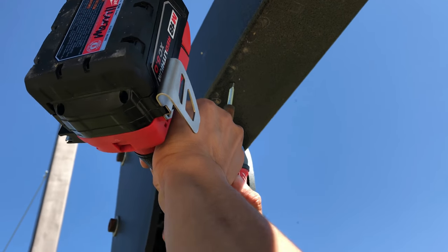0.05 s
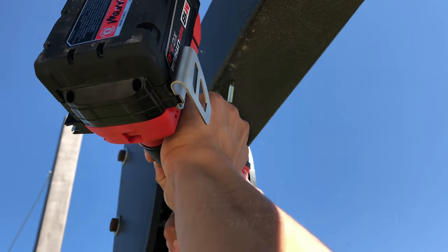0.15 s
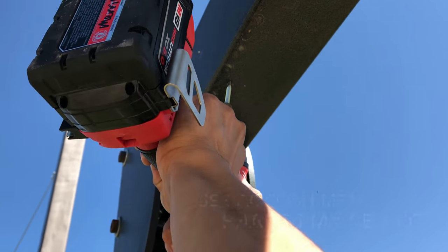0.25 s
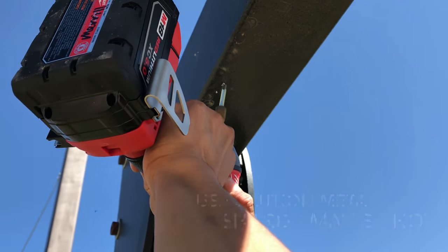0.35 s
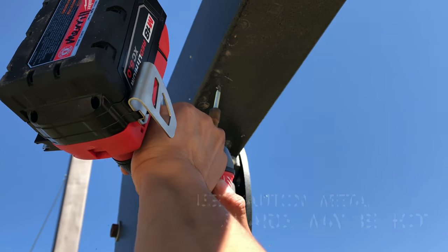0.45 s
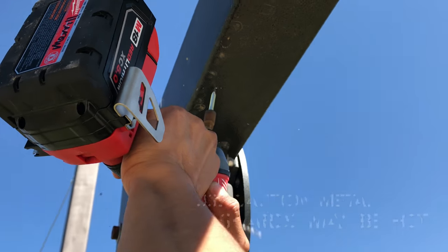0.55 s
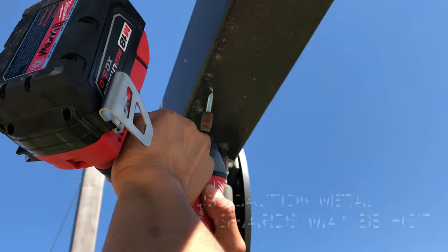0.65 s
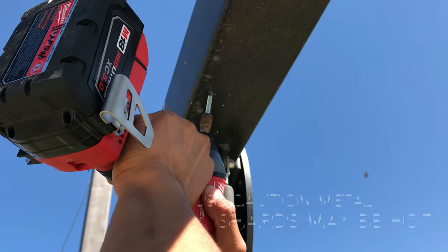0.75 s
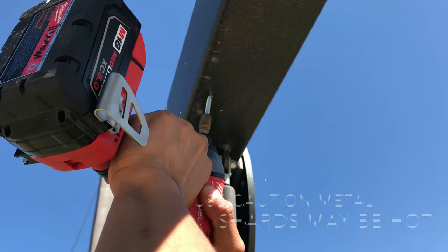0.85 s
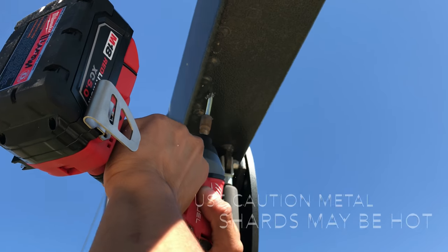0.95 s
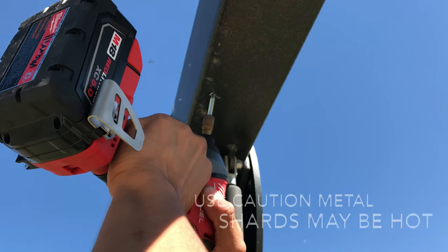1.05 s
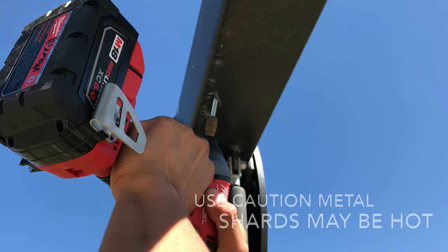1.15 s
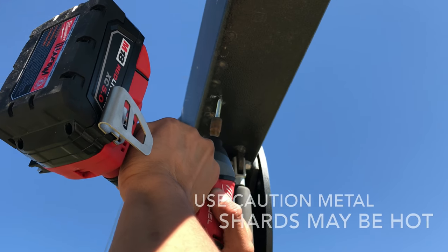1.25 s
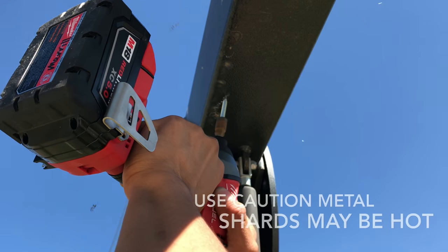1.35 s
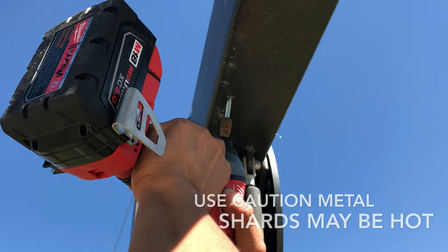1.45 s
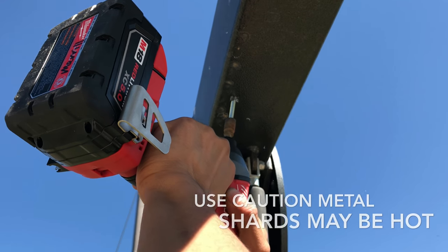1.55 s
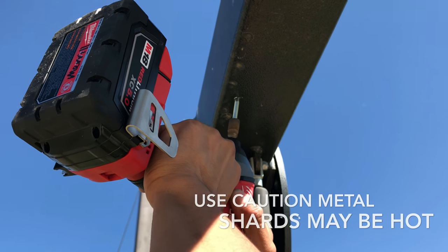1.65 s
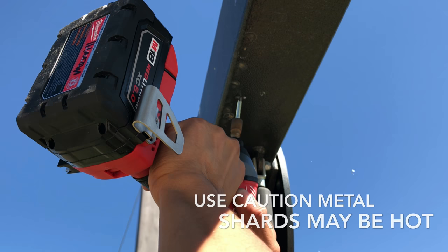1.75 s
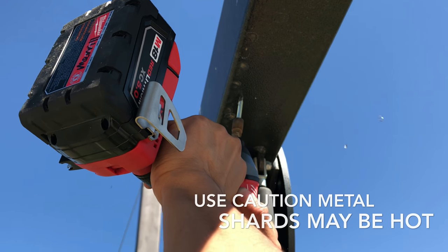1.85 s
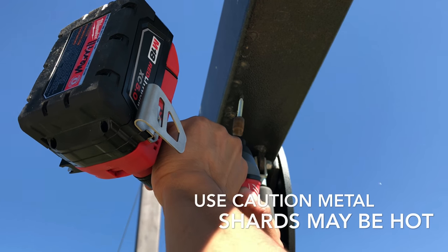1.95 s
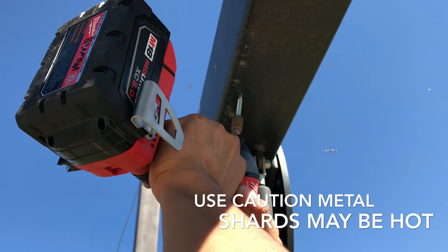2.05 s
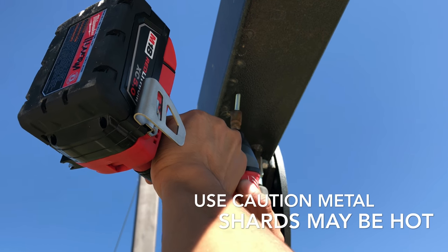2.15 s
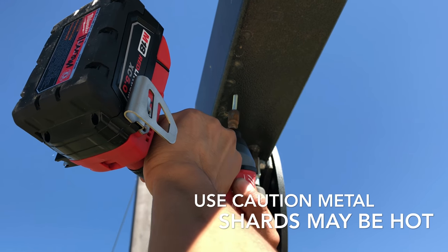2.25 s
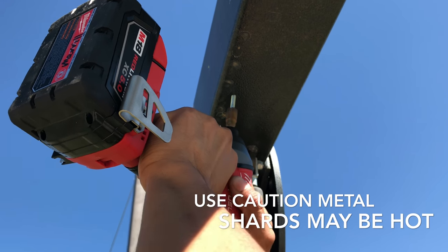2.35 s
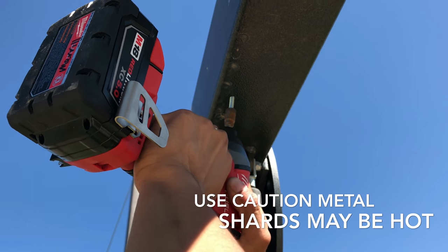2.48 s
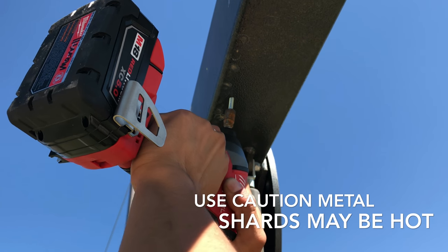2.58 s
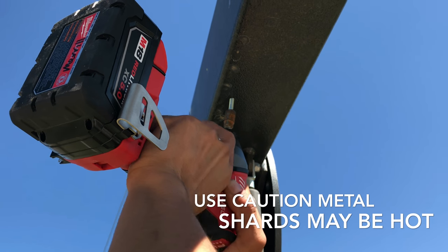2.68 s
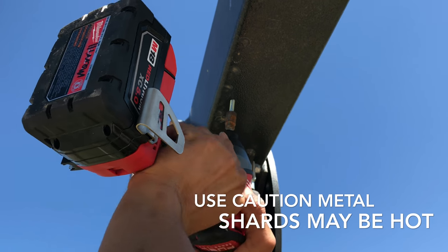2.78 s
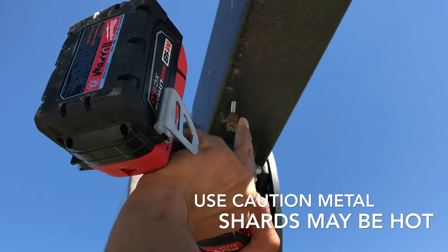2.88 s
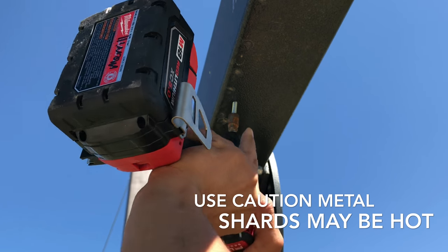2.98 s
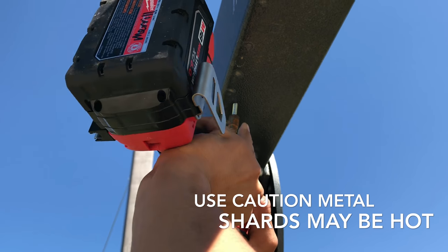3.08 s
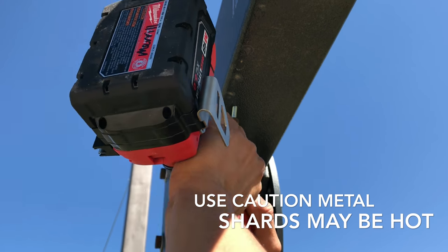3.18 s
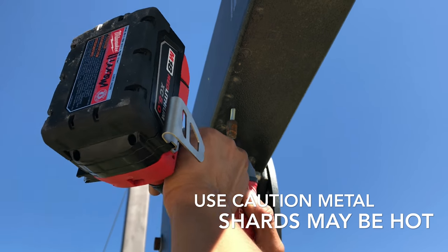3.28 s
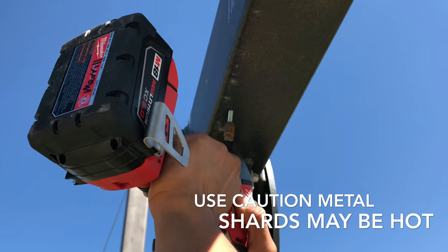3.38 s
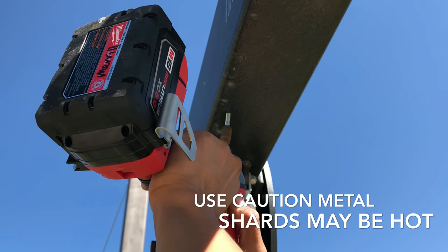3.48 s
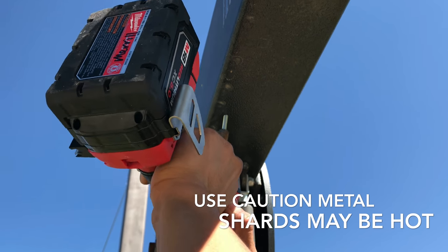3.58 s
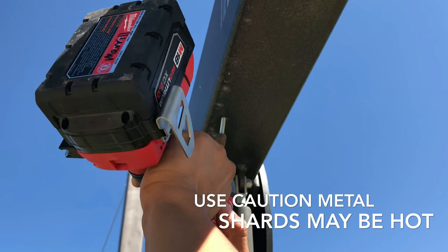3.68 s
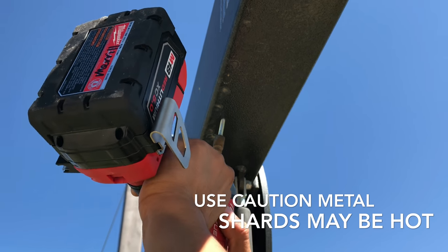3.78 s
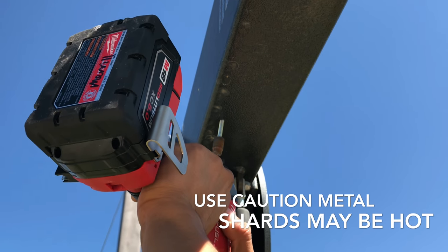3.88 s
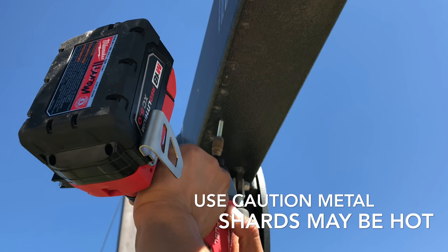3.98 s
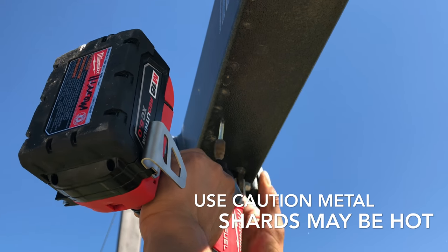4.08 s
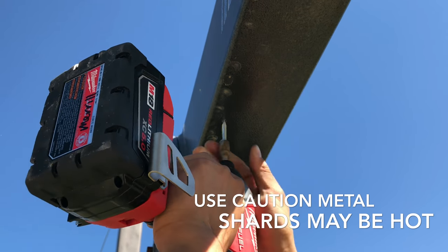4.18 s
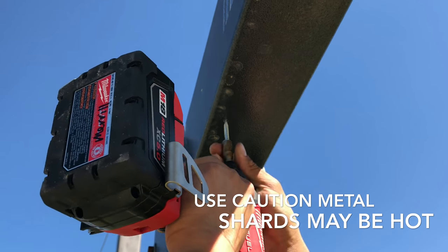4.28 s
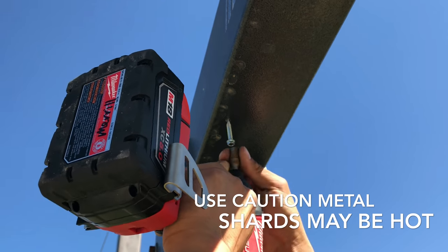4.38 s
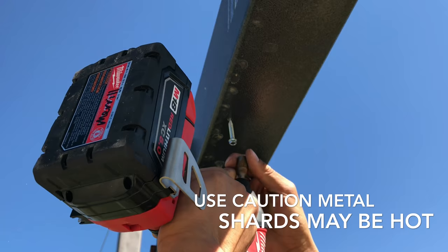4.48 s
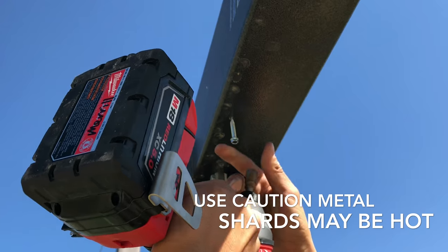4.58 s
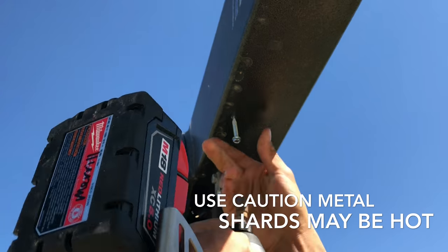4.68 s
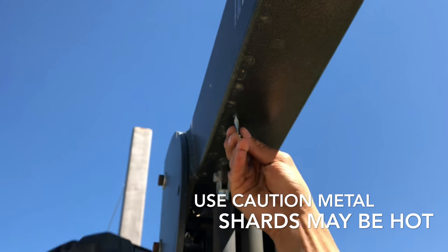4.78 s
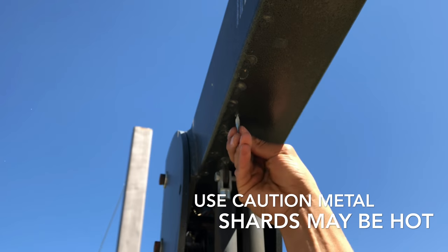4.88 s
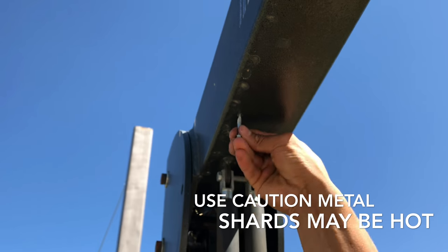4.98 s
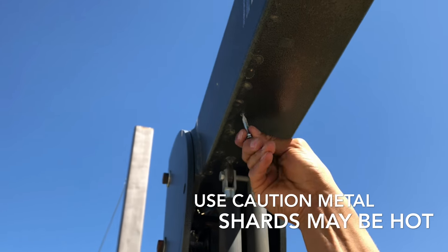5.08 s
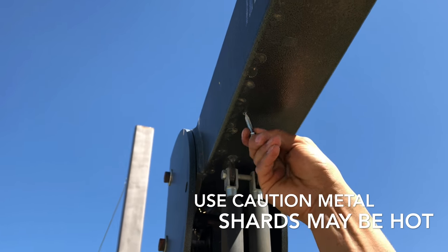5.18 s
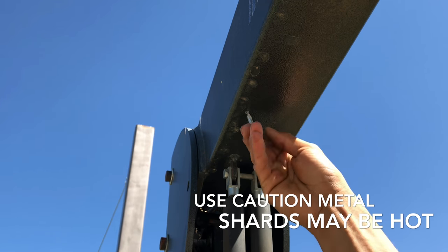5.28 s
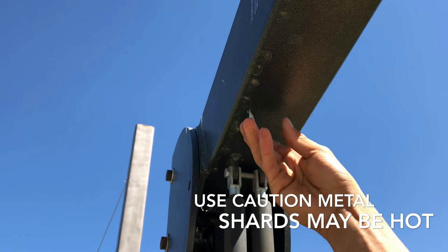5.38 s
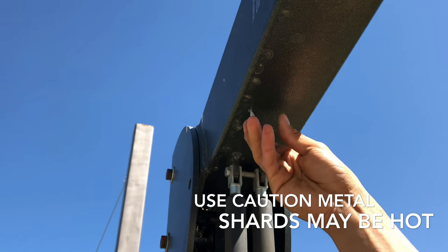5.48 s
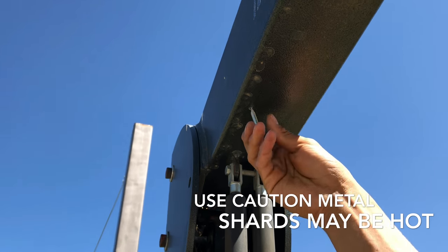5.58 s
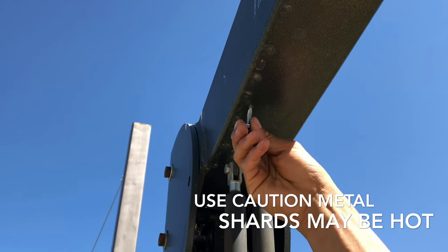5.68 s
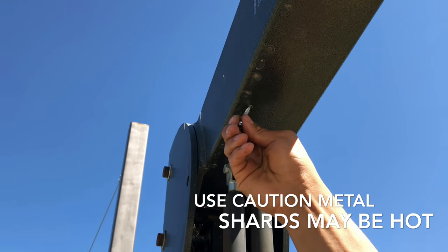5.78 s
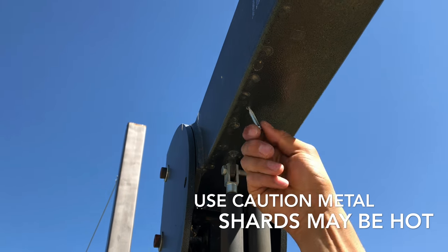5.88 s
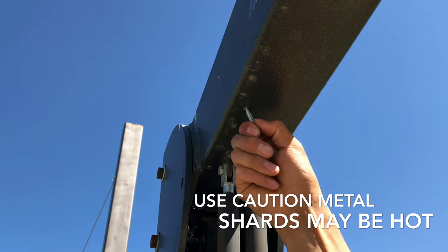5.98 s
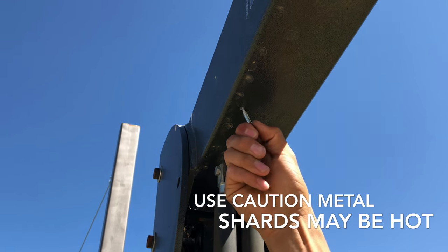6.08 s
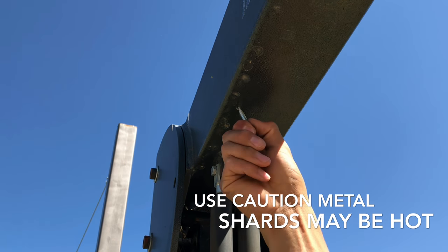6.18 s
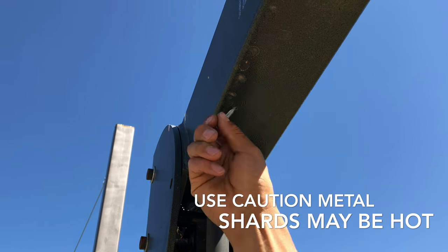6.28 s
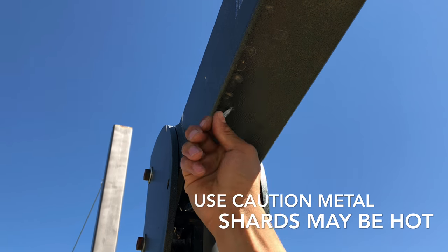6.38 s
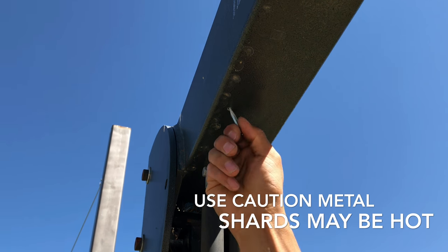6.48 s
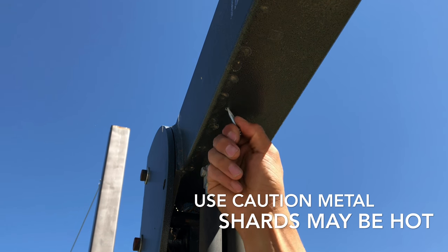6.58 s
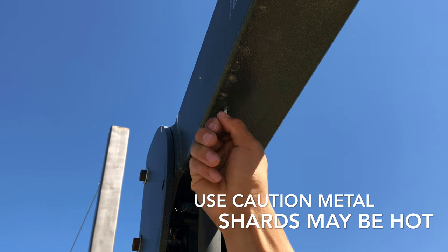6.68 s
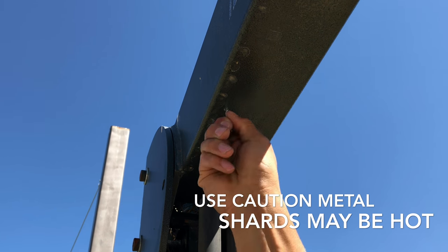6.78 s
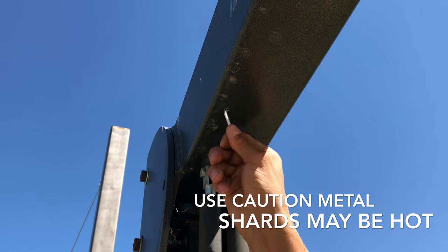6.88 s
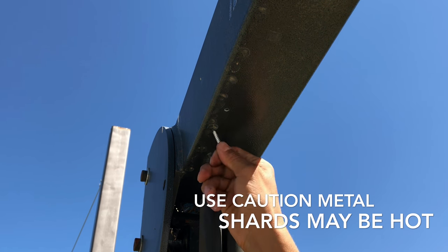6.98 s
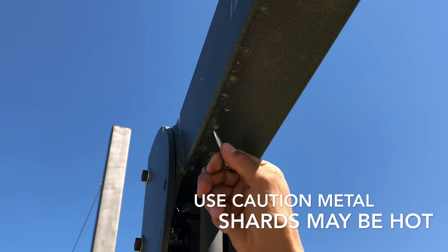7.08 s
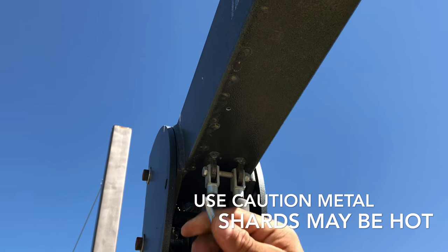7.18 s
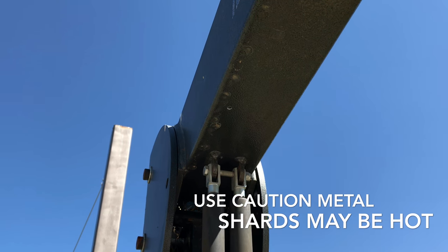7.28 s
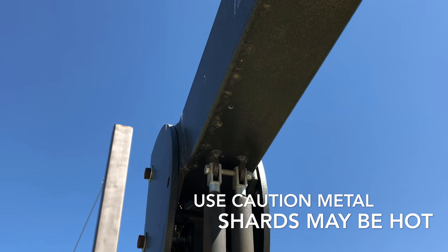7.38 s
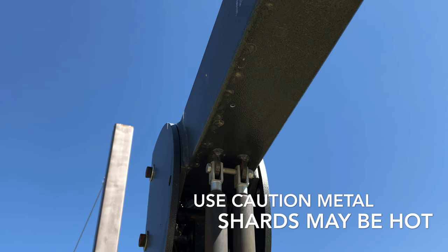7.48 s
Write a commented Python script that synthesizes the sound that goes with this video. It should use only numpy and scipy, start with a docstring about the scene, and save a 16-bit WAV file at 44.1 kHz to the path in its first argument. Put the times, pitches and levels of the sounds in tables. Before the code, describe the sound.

A loud, rough gear whine with gritty cutting noise opens, slowing slightly before a rattling burst of steel hammering. It cuts off, leaving a faint ring and small clicks. A second violent burst loosens into a light, quick free spin and a clicking stop. The holder slips off with a tiny ping; fingers rub faintly, then the steel is knocked. Close, dry pickup in open air, with a faint rumble and far traffic.

```python
"""A gear whine opens the scene: a cordless impact driver sinks a self-drilling screw into a steel arm.
It hammers as the thread bites, stops, hammers again and spins free; then fingers rub and the arm is knocked.
A low outdoor rumble and a far hush of traffic lie below. The whine is a sum of sines locked to the spindle
angle; blows, cutting and whine excite decaying modes of the arm; rush, rumble and hush are filtered noise."""
import sys
import numpy as np
from scipy import signal
from scipy.fft import rfft, irfft
from scipy.io import wavfile
from scipy.ndimage import uniform_filter1d, minimum_filter1d

SR = 44100
rng = np.random.default_rng(int(sys.argv[2]) if len(sys.argv) > 2 else 0)


def log_audio(samples):
    """Write samples as a 16-bit WAV file to the path given in sys.argv[1]."""
    # one column per channel
    frames = np.atleast_2d(samples).T
    # limit to full scale, then quantise
    limited = np.clip(frames, -1, 1)
    pcm = np.round(limited * 32767).astype(np.int16)
    wavfile.write(sys.argv[1], SR, pcm)


N = 332759
T = np.arange(N) / SR   # time axis [s]
BITE_S, LET_GO_S = 2.12, 3.79   # the thread bites and hammering begins; the load comes off


def amp(db):
    """Logarithmic level: decibels to an amplitude gain."""
    return 10 ** (np.asarray(db) / 20)


def rms_one(x):
    """Normalisation: scale a signal to unit rms."""
    return x / np.sqrt(np.mean(x ** 2) + 1e-20)


def in_time(*tables, fade=.012):
    """Linear interpolation of successive tables over time, with a last column that gates the gaps shut."""
    s, *columns = np.transpose(np.vstack(tables))
    gate = np.zeros(N)
    for table in tables:
        start, end = table[0][0], table[-1][0]
        gate += np.interp(T, [start - fade, start, end, end + fade], [0, 1, 1, 0])
    return [np.interp(T, s, column) for column in columns] + [gate]


def at_hz(points, hz):
    """Linear interpolation of a table on a log-frequency axis."""
    hz_points, values = np.array(points).T[:2]
    return np.interp(np.log(hz), np.log(hz_points), values)


def drift(rate):
    """Low-passed random fluctuation: two-pole filtered noise of unit rms, slower for a low rate [Hz]."""
    r = np.exp(-32 * np.pi * rate / SR)   # one step per 16 samples
    white = rng.standard_normal(N // 16 + 4002)
    slow = signal.lfilter([1], [1, -2 * r, r * r], white)[4000:]   # drop the filter's start
    return np.interp(np.arange(N) / 16, np.arange(len(slow)), rms_one(slow))


def clicks(seconds, db):
    """Impulse excitation: single samples of given heights."""
    out = np.full(N, 1e-18)
    np.add.at(out, (np.asarray(seconds) * SR).astype(int), amp(db))
    return out


def ring(x, hz, t60):
    """Damped resonance: a unit click sets a sine of height 1 ringing."""
    r, w = amp(-60 / (t60 * SR)), 2 * np.pi * hz / SR
    return signal.lfilter([0, np.sin(w)], [1, -2 * r * np.cos(w), r * r], x)


def dying(x, t60):
    """Exponential decay: every sample leaves a tail that falls 60 dB in t60."""
    return signal.lfilter([1], [1, -amp(-60 / (t60 * SR))], x)


def bands(spectrum):
    """Spectral shaping: pairs of centre frequency and half-octave noise, of unit rms when summed."""
    edges, white = 90 * 2 ** np.arange(0, 7.8, .5), rng.standard_normal((2, N))
    centres = np.sqrt(edges[1:] * edges[:-1])
    parts = []
    for k, hz in enumerate(centres):
        band = signal.butter(2, edges[k:k + 2], "band", fs=SR, output="sos")
        parts.append(amp(at_hz(spectrum, hz)) * signal.sosfilt(band, white[k % 2]))
    parts = np.array(parts)
    return zip(centres, parts / parts.sum(0).std())


# Spindle speed in two runs: start_s, speed_turns_per_s
SPINDLE_SPEED = [
    [(0, 43.5), (.2, 42.5), (.5, 41.35), (.72, 40.85), (.86, 42.1), (1.4, 40.7), (1.52, 41.0), (1.75, 40.6),
     (1.9, 39.9), (2, 38.3), (2.1, 36), (2.3, 35)],
    [(3.74, 38.5), (3.8, 39.3), (3.86, 41.3), (4.01, 44.2), (4.05, 44.8), (4.1, 41.6), (4.155, 34)],
]


def spindle():
    """Rotation: integrated speed gives the angle in turns, with a gate open while it spins."""
    turns_per_s, spinning = in_time(*SPINDLE_SPEED)
    return np.cumsum(turns_per_s) / SR, spinning


# Tones as multiples of the spindle: its wobble, the 63-tooth gear mesh with side tones,
# the motor poles and the 10-blade fan on the 8:1 motor: order_per_turn
SPINDLE_ORDERS = [1, 2, 3, 4, 5, 7, 8, 10, 11, 13, 32, 54, 55, 62, 63, 64, 66, 80, 124, 126, 128, 129, 130,
                  171, 180, 189, 207, 243, 288]
# Relative level of each order in the first run: level_db
FIRST_RUN_ORDER_DB = [-27, -24, -31.5, -33, -31, -29.5, -31.5, -26.5, -18, -18.5, -24.5, -8.5, -11, -1, 4,
                      0, -5.5, -6.5, -7.5, -2, -6, -13, -4, -16.5, -14, -7.5, -11, -23.5, -12.5]
# Relative level of each order spinning free in the second run: level_db
FREE_ORDER_DB = [-40, -44, -32, -38, -28, -20.5, -30, -35, -23, -32, -6.5, -28, -24, -24.5, -19.5, -27, -22,
                 7, -19, -22.5, -8, -19.5, 4.5, -27.5, -28, -29, -23.5, -34, -34]
# Overall whine in each run: start_s, level_db
WHINE_LEVEL = [
    [(0, -31.5), (.7, -28), (1.8, -26.5), (2.05, -26.5), (2.3, -23)],
    [(3.74, -36.5), (3.86, -45), (4.05, -38.5), (4.155, -41.5)],
]
STUTTER_DB, STUTTER_ENDS_S = 6.5, 4.03   # unloaded, the high orders stutter once a turn


def whine(turns, spinning, rough_db=2.6):
    """Order synthesis: each order is a sine locked to the spindle angle, wavering in level and phase."""
    out = np.zeros(N)
    whine_db = in_time(*WHINE_LEVEL)[0]
    stuttering = (T > LET_GO_S) & (T < STUTTER_ENDS_S)
    stutter_db = STUTTER_DB * np.sin(2 * np.pi * turns) * stuttering
    for order, first_db, free_db in zip(SPINDLE_ORDERS, FIRST_RUN_ORDER_DB, FREE_ORDER_DB):
        waver_db = rough_db * drift(1.5 + .4 * order)   # high orders flutter faster
        wander = .006 * order * drift(25)               # phase tremble [rad]
        order_db = np.where(T < 3, first_db, free_db)
        level = amp(whine_db + order_db + waver_db + (order > 100) * stutter_db)
        phase = 2 * np.pi * order * turns + wander + rng.uniform(0, 7.1)
        out += np.sqrt(2) * level * np.sin(phase)
    return spinning * out


def throb(turns, once=1.2, twice=1.3, motor=1.1):
    """Amplitude modulation: a beat [dB] per spindle turn, per cutting lip (two) and per motor turn."""
    angle = 2 * np.pi * turns
    return amp(once * np.sin(angle) + twice * np.sin(2 * angle + 1) + motor * np.sin(8 * angle))


# Load on the bit in two runs, heard as cutting noise in the arm: start_s, level_db
BIT_LOAD = [
    [(0, -21), (1.9, -22), (2.1, -20.5), (2.2, -4.5), (2.3, -8.5), (2.4, -18.5), (2.58, -17), (2.66, -40.5),
     (2.72, -54)],
    [(3.44, -40), (3.484, -24.5), (3.495, -11.5), (3.57, -1.5), (3.64, -11), (3.76, -13), (3.8, -32.5),
     (4.15, -30), (4.19, -30.5), (4.232, -42)],
]


def load(turns):
    """Load coupling: the load level, and the beat of the turning tool gated to its runs."""
    load_db, running = in_time(*BIT_LOAD)
    return load_db, running * throb(turns)


# Margin of the rush over the load while drilling, hammering, spinning free: level_db
RUSH_MARGINS = (0, -11, 0.5)
RUSH_WARM_UP_DB, RUSH_WARM_UP_S = -3.5, 1   # the rush grows as the tip digs in


def rush_level(load_db):
    """Load-dependent radiation: the rush follows the load by a margin for each working state."""
    drilling_db, hammering_db, free_db = RUSH_MARGINS
    margin_db = np.where(T < BITE_S, drilling_db, np.where(T < LET_GO_S, hammering_db, free_db))
    warm_db = RUSH_WARM_UP_DB * np.clip(1 - T / RUSH_WARM_UP_S, 0, 1)
    return amp(load_db + uniform_filter1d(margin_db, size=2000) + warm_db)


# Gear rattle, brush of the fan air and chips, relative density: pitch_hz, level_db (per Hz)
LOADED_RUSH = [(59, -59), (100, -38), (373, -34.5), (442, -22.5), (768, -30.5), (1610, 4.5), (2370, -5),
               (2580, 1), (3540, -4), (5190, -9.5), (5900, 1), (7610, -1.5), (16000, -6.5)]
# The same noise unloaded: pitch_hz, level_db (per Hz)
UNLOADED_RUSH = [(59, -50), (100, -26), (302, -7.5), (381, -34), (442, -19), (595, -6), (752, -25),
                 (1420, 8.5), (2580, -13), (3470, -4), (3860, -4.5), (8640, -7.5), (16000, -20)]
# Resonance of the gear housing, heard unloaded: pitch_hz, t60_s, level_db
GEAR_HOUSING = (8640, 0.0065, -8.5)


def patchy(spectrum):
    """Independent band fluctuation: each noise band drifts in level by itself."""
    return sum(noise * amp(0.98 * drift(20)) for hz, noise in bands(spectrum))


def rush(level):
    """Broadband turbulence and rattle: patchy noise, recoloured and joined by the housing once unloaded."""
    loaded, free = patchy(LOADED_RUSH), patchy(UNLOADED_RUSH)
    hz, t60, housing_db = GEAR_HOUSING
    housing = rms_one(ring(rng.standard_normal(N), hz, t60))
    free = free + amp(housing_db + 2.2 * drift(30)) * housing
    return level * np.where(T < LET_GO_S, loaded, free)


# Hammer on anvil, also played by cracks(): start_s, level_db (strength)
HAMMER_BLOWS = [(2.1036, -17.5), (2.144, -16), (2.1677, -10.5), (2.1925, -6.5), (2.2187, -8.5),
                (2.2413, -3), (2.264, -8), (2.2862, -9), (2.3053, -3), (2.3259, -7.5), (2.3489, -10.5),
                (2.3695, -13), (2.3919, -9.5), (2.4163, -16.5), (2.441, -17.5), (2.4634, -18),
                (2.491, -11.5), (2.514, -19), (2.5398, -11), (2.5691, -19), (2.5941, -11), (2.6258, -26.5),
                (3.487, -16), (3.5057, -14.5), (3.5389, -5), (3.5585, -10.5), (3.5827, -12.5),
                (3.6082, -1.5), (3.632, -4.5), (3.6555, -1), (3.6805, -6.5), (3.7046, -13.5), (3.7295, -2),
                (3.7627, -8.5)]
# Touches on the arm: start_s, level_db
ARM_KNOCKS = [(4.426, -50.5), (4.449, -49), (5.946, -62), (6.052, -57.5), (6.947, -51), (6.993, -41.5),
              (7.008, -27.5), (7.034, -33), (7.068, -46)]
# Dull low jolts of the arm, under the hammering and the last knock, also played by thumps(): start_s, level_db
LOW_JOLTS = [(2.192, -11), (2.239, -37), (2.415, -23), (2.541, -18.5), (2.58, -16.5), (3.486, -39),
             (3.51, -7.5), (3.656, -16.5), (3.759, -23), (7.035, -30), (7.068, -28)]
# Clear modes of the steel arm: pitch_hz, level_db, t60_s
ARM_MODES = [(453, -31.5, 3.05), (479.6, -34.5, 3), (462, -12, .15), (307, -20, 0.13), (372, -32, .3),
             (527.7, -11, 0.37), (595.1, -7.5, 0.33), (623, -26, 0.9), (685, -38, 1.6), (890, -24, 0.63),
             (1034, -16, .2), (1114, -11, 0.17), (1238, -20.5, 0.47), (1394, -4, 0.2), (1423, -4.5, 0.22),
             (1454, -1.5, 0.22), (1595, -1.5, .11), (1614, 2, .12), (1647, -2, .13), (1750, -11.5, 0.29),
             (1946, -17, 0.31), (2120, -1, 0.18), (2251, -5.5, 0.17), (2350, -13.5, .2), (2508, -10.5, .15),
             (3070, -1.5, .12), (3266, -7, .13), (3360, -9, 0.22), (3903, -9.5, .13), (4270, -1, .09),
             (5380, -11.5, 0.053)]
# The arm's countless close modes, relative density: pitch_hz, level_db (per Hz)
WASH_SPECTRUM = [(59, -57), (100, -37.5), (381, -42), (461, -18.5), (721, -17), (1280, 0), (1610, 4.5),
                 (1830, -10.5), (2170, -2), (2420, 3.5), (4380, -3.5), (4980, -2), (16000, -9)]
# Decay of those close modes: pitch_hz, t60_s
WASH_DECAY = [(200, 0.12), (1500, 0.25), (4000, 0.15), (8000, 0.04), (15000, 0.032)]
# Short slam of a blow over that wash: pitch_hz, level_db
SLAM_SPECTRUM = [(200, -2), (1500, 0.5), (4000, 6.5), (8000, -2.5), (15000, 10)]
SLAM_T60_S = .06
THUD_HZ = 750   # modes below this answer to the thud
RING_DB, THUD_DB = -10.5, -19.5   # a blow's drive of ring and low thud, over its strength
KNOCK_THUD_DB, KNOCK_WASH_DB = -26, 2.5   # knocks hardly move the low modes, and sound more in the wash
LONG_RING_HZ, DAMPED_S = 453, 4.1   # this ring is damped once the screw comes loose
CONTACT_SPREAD_DB = 3   # the contact shifts, so each mode is driven unevenly
BLOW_SPREAD_DB = 3.5    # chance differences between blows


def arm(cutting, whining, contact_t60=0.026):
    """Modal synthesis: contacts, cutting and whine ring clear modes and a wash dying band by band."""
    blow, knock, jolt = np.array(HAMMER_BLOWS), np.array(ARM_KNOCKS), np.array(LOW_JOLTS)
    at = np.r_[blow[:, 0], knock[:, 0]]
    high_db = np.r_[blow[:, 1] + RING_DB, knock[:, 1]]
    low_at = np.r_[at, jolt[:, 0]]
    low_db = np.r_[blow[:, 1] + THUD_DB, knock[:, 1] + KNOCK_THUD_DB, jolt[:, 1]]
    wash_db = np.r_[blow[:, 1] + RING_DB, knock[:, 1] + KNOCK_WASH_DB]

    # short rough contacts: decaying envelopes on noise
    high = dying(clicks(at, high_db - 18.5), contact_t60)
    low = dying(clicks(low_at, low_db - 18.5), contact_t60)
    out, grit = np.zeros(N), rng.standard_normal(N)
    for hz, mode_db, t60 in ARM_MODES:
        contact = low if hz < THUD_HZ else high
        push = (contact + amp(-39) * cutting) * grit + amp(-43.5) * whining
        uneven_push = push * amp(CONTACT_SPREAD_DB * drift(13))
        alive = np.clip((DAMPED_S - T) / .2 + 1, 0, 1) if hz == LONG_RING_HZ else 1
        out += alive * amp(mode_db) * ring(uneven_push, hz, t60)

    for hz, noise in bands(WASH_SPECTRUM):
        # doubled decibels turn amplitude into energy, whose decay takes half the t60
        struck = clicks(low_at, 2 * (low_db + 6)) if hz < THUD_HZ else clicks(at, 2 * wash_db)
        energy = dying(struck + (amp(-29.0) * cutting) ** 2, at_hz(WASH_DECAY, hz) / 2)
        uneven_db = rng.normal(0, BLOW_SPREAD_DB, len(blow))
        slam_db = blow[:, 1] + at_hz(SLAM_SPECTRUM, hz) + uneven_db
        slam = dying(clicks(blow[:, 0], slam_db), SLAM_T60_S)
        out += noise * np.sqrt(energy + slam ** 2)
    return out


# Low background rumble, sinking around the first hammering and rising again: start_s, level_db
RUMBLE_LEVEL = [(0, -62), (.8, -57), (2.0, -66.5), (2.9, -61.5), (3.5, -51.5), (4.2, -58.5), (4.8, -52.5),
                (7.55, -51)]
# Far hush of traffic, relative density: pitch_hz, level_db (per Hz)
AIR_SPECTRUM = [(150, -29), (250, 0.5), (510, -6), (748, 0), (1850, -5), (4260, -14), (7570, -23.5),
                (8550, -25), (16000, -20.5)]
AIR_DB = -55.5


def outdoors():
    """Ambient noise: a lumpy low-band rumble and a far, smooth hush."""
    band = signal.butter(2, [48, 130], "band", fs=SR, output="sos")
    low_noise = rms_one(signal.sosfilt(band, rng.standard_normal(N)))
    rumble = low_noise * amp(in_time(RUMBLE_LEVEL)[0] + 0.84 * drift(5))
    hush = sum(noise * amp(0.64 * drift(1.8)) for hz, noise in bands(AIR_SPECTRUM))
    return rumble + amp(AIR_DB) * hush


# Modes of hammer and anvil: pitch_hz, level_db, t60_s
ANVIL_MODES = [(6200, -4.5, 0.051), (9550, -4.5, 0.016), (11500, -9.5, 0.033)]
CRACK_DB, CRACK_FOLLOWS = -9, 0.52   # snap level, and how far it follows the strength (dB per dB)


def cracks(t60=0.012, low_hz=8000):
    """Hard impact: each steel blow gives a bright high-passed noise snap and a short ring of the anvil."""
    s, strength_db = np.transpose(HAMMER_BLOWS)
    snap_db = CRACK_DB + CRACK_FOLLOWS * strength_db + rng.normal(0, BLOW_SPREAD_DB, len(s))
    snap = dying(clicks(s, snap_db), t60) * rng.standard_normal(N)
    out = signal.sosfilt(signal.butter(2, low_hz, "high", fs=SR, output="sos"), snap)
    for hz, mode_db, mode_t60 in ANVIL_MODES:
        uneven_db = rng.normal(0, BLOW_SPREAD_DB, len(s))
        out += ring(clicks(s, snap_db + mode_db + uneven_db), hz, mode_t60)
    return out


THUMP_HZ, THUMP_T60_S, THUMP_DB = 190, 0.05, -18   # the jolt also shakes the whole arm


def thumps():
    """Whole-body motion: each jolt leaves a decaying low lump of noise."""
    s, db = np.transpose(LOW_JOLTS)
    band = signal.butter(3, [THUMP_HZ / 2, THUMP_HZ * 2], "band", fs=SR, output="sos")
    noise = rms_one(signal.sosfilt(band, rng.standard_normal(N)))
    lumps = dying(clicks(s, db + THUMP_DB), THUMP_T60_S) * noise
    return signal.sosfilt(band, lumps)


def puffs(events, t60, width):
    """Transient noise: puffs that decay in t60, in a band from pitch / width to pitch * width."""
    out, t = np.zeros(N), np.arange(4000) / SR
    for s, peak_db, hz in events:
        band = signal.butter(2, [hz / width, min(hz * width, 19000)], "band", fs=SR)
        puff = signal.lfilter(*band, rng.standard_normal(4000) * amp(-60 * t / t60))
        start = int(s * SR)
        out[start:start + 4000] += amp(peak_db) * puff / np.abs(puff).max()
    return out


# Sharp clicks of trigger, brake and bit holder: start_s, level_db (peak), pitch_hz
SHARP_TICKS = [(3.028, -28, 4980), (3.031, -20, 5980), (3.064, -18.5, 3900), (3.407, -17, 4300),
               (4.167, -17, 11100), (4.177, -12, 5840), (4.216, -17, 7800), (4.232, -21, 5180),
               (4.673, -35, 6840), (4.683, -34, 7060), (4.693, -25, 11000), (4.6935, -27.5, 3500)]
# Soft rubs of fingers on tool and screw: start_s, level_db (peak), pitch_hz
FINGER_RUBS = [(3.138, -47, 6000), (3.25, -46, 4100), (3.279, -43, 4050), (5.085, -46.5, 1483),
               (5.375, -34, 550), (5.42, -47, 4520), (5.702, -46, 500), (6.06, -40, 3954),
               (6.585, -48, 6000), (6.839, -46.5, 6000)]
# Ring of the bit holder: level_db, pitch_hz, t60_s
HOLDER_PING = (-22, 11600, .03)
PING_S = 4.693   # the bit holder slips off the screw


def hands():
    """Contact and friction: short ticks, longer soft rubs, and one damped ping of the bit holder."""
    sharp = puffs(SHARP_TICKS, t60=0.014, width=2.1)
    soft = puffs(FINGER_RUBS, t60=0.058, width=1.85)
    ping_db, hz, t60 = HOLDER_PING
    return sharp + soft + ring(clicks([PING_S], ping_db), hz, t60)


# Song of the motor controller as it starts: start_s, split_hz (each side of the centre), level_db
CHOPPER_SPLIT = [(3.439, 10, -94), (3.439, 21, -44), (3.461, 212.5, -32.5), (3.49, 603, -28.5),
                 (3.51, 805, -68)]
CHOPPER_HZ = 9880   # switching pitch


def chopper():
    """Sideband modulation: a sine times a cosine makes two tones spreading from the switching pitch."""
    split_hz, level_db, gate = in_time(CHOPPER_SPLIT)
    carrier = np.sin(2 * np.pi * CHOPPER_HZ * T)
    modulator = np.cos(2 * np.pi * np.cumsum(split_hz) / SR)
    return gate * amp(level_db) * 2 * carrier * modulator


def scene():
    """Superposition: tool, arm and hands close by, summed with the open air."""
    turns, spinning = spindle()
    load_db, beat = load(turns)
    whining = whine(turns, spinning)
    tool_noise = rush(rush_level(load_db) * beat) + cracks() + arm(amp(load_db) * beat, whining)
    # small parts radiate little bass noise
    no_bass = signal.butter(2, 230, "high", fs=SR, output="sos")
    tool = whining + signal.sosfilt(no_bass, tool_noise)
    return (tool + thumps() + chopper() + hands() + outdoors())[None]


CUTOFF_HZ = 16050


def record(dry, step_hz=10100, step_db=-3.5, release_db_per_s=150):
    """Microphone response and limiting: a treble step, bass loss, a fast full-scale limiter and a top cut."""
    hz = np.fft.rfftfreq(N, 1 / SR)
    treble_step = amp(step_db / (1 + np.exp((step_hz - hz) / 80)))
    bass_loss = np.sqrt(1 + (40 / (hz + 1)) ** 6)
    x = irfft(rfft(dry[0]) * treble_step / bass_loss, N)
    x = signal.sosfilt(signal.cheby2(24, 70, CUTOFF_HZ, fs=SR, output="sos"), x)
    over_db = np.maximum(20 * np.log10(np.abs(x) + 1e-9), 0)
    # hold each peak, then release at a steady rate
    held_db = np.maximum.accumulate(over_db + release_db_per_s * T) - release_db_per_s * T
    ahead_db = -minimum_filter1d(-np.maximum(held_db, 0), size=129)   # the gain starts to fall before a peak
    x = x * amp(-uniform_filter1d(ahead_db, size=64))
    return signal.sosfilt(signal.cheby2(16, 50, 16800, fs=SR, output="sos"), x)[None]


dry = scene()
out = record(dry)
log_audio(out)
```